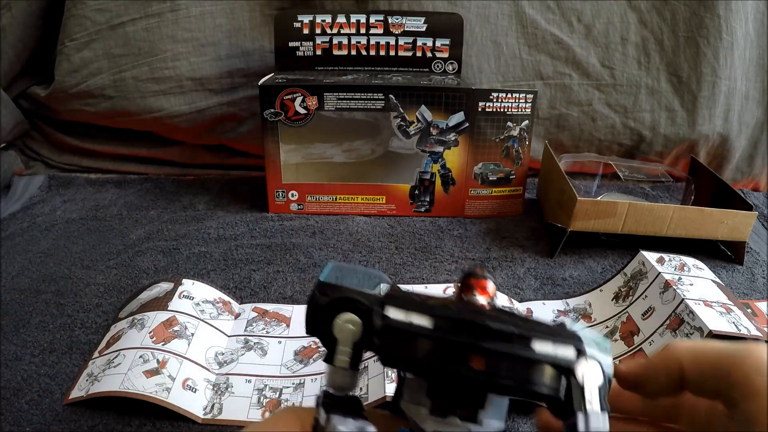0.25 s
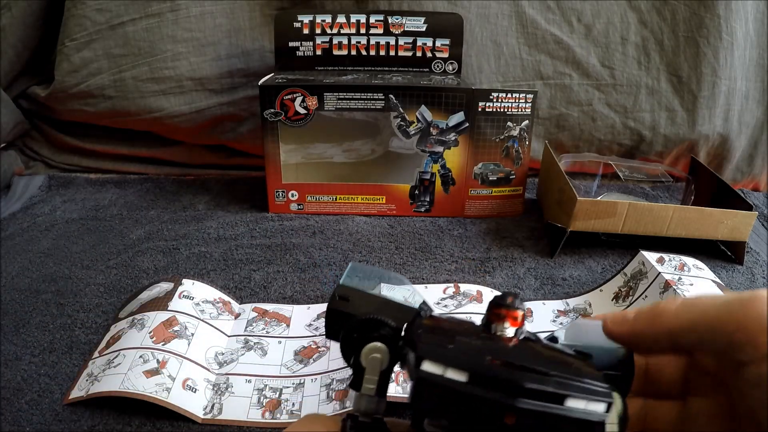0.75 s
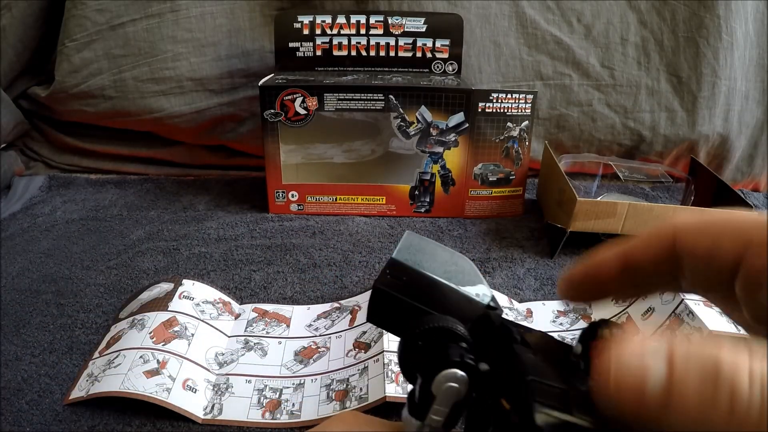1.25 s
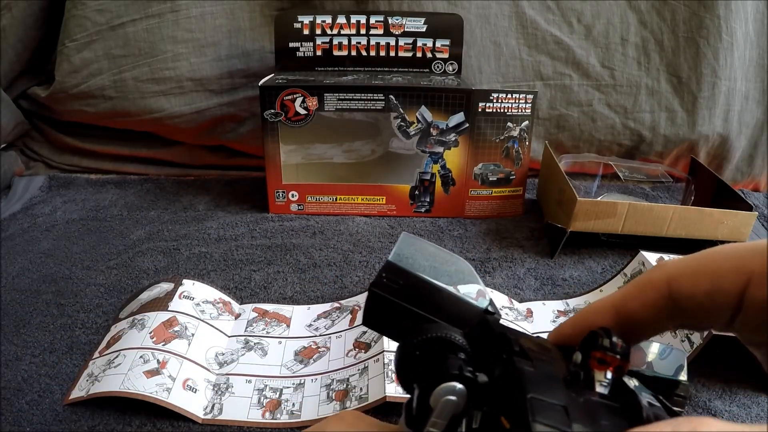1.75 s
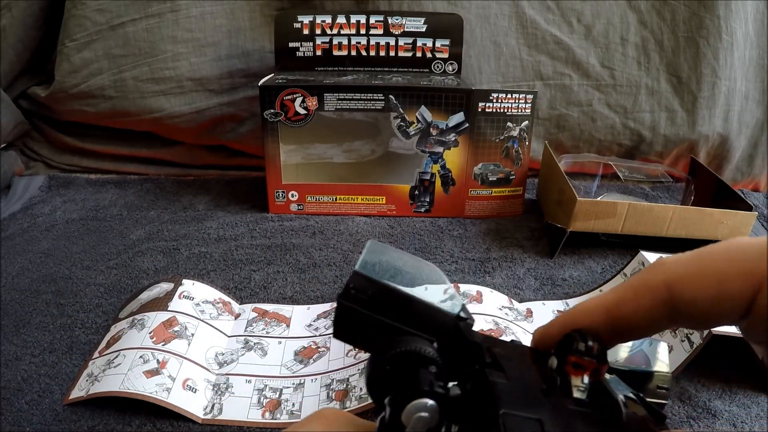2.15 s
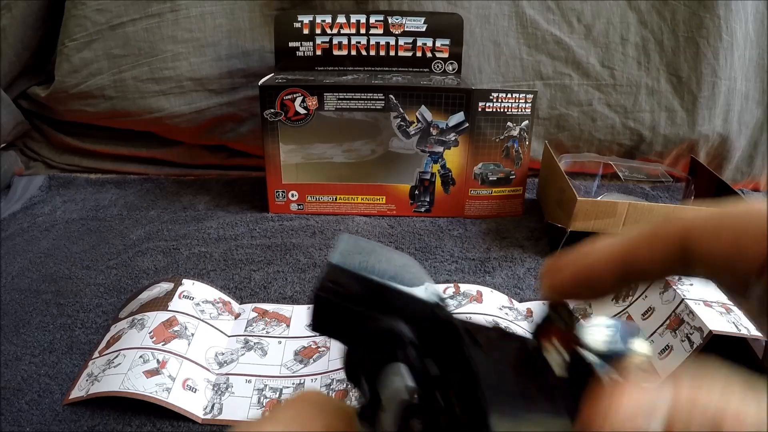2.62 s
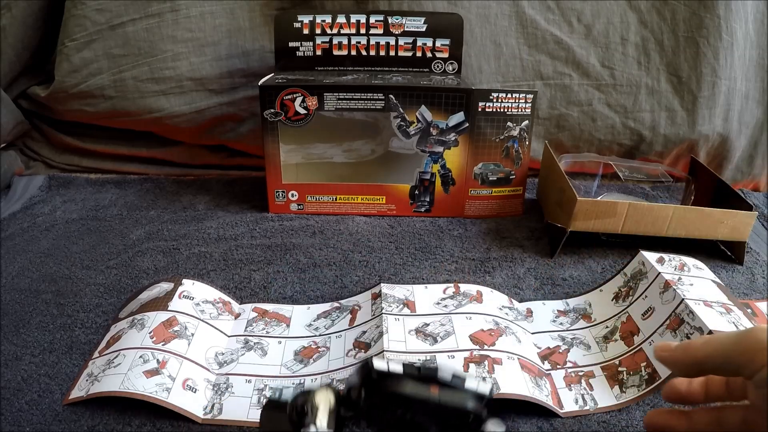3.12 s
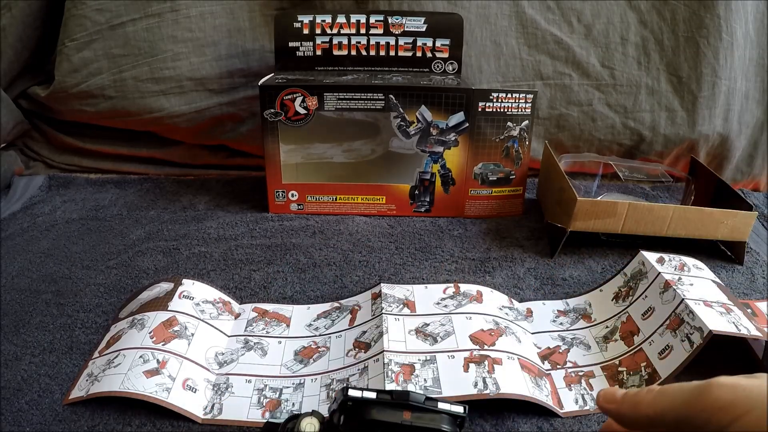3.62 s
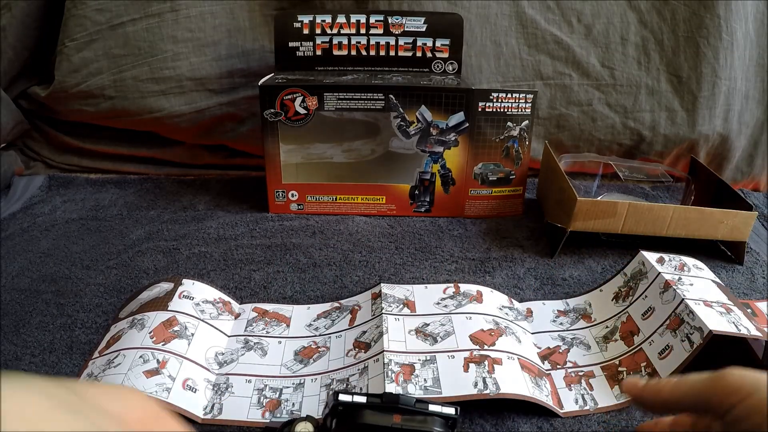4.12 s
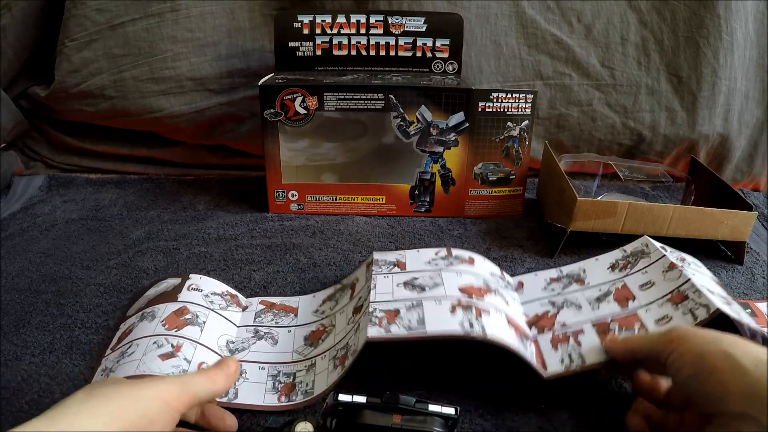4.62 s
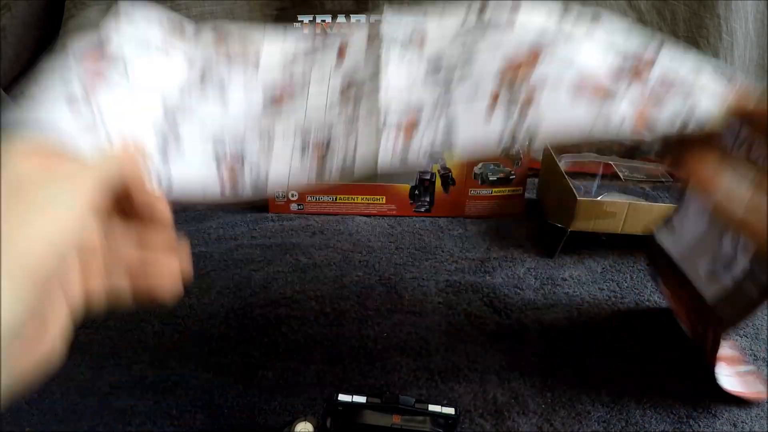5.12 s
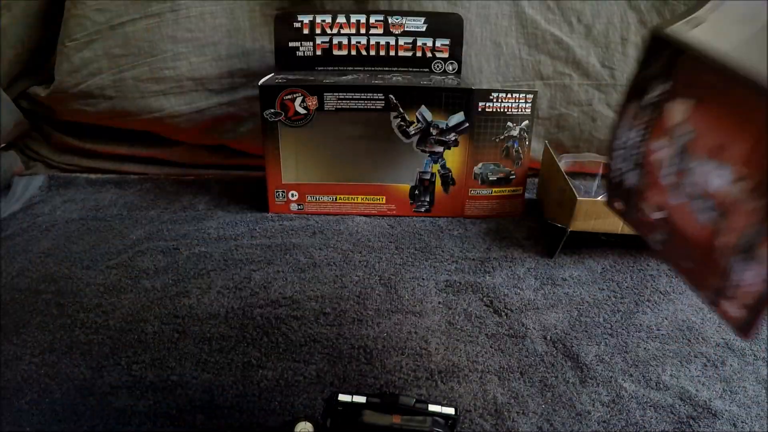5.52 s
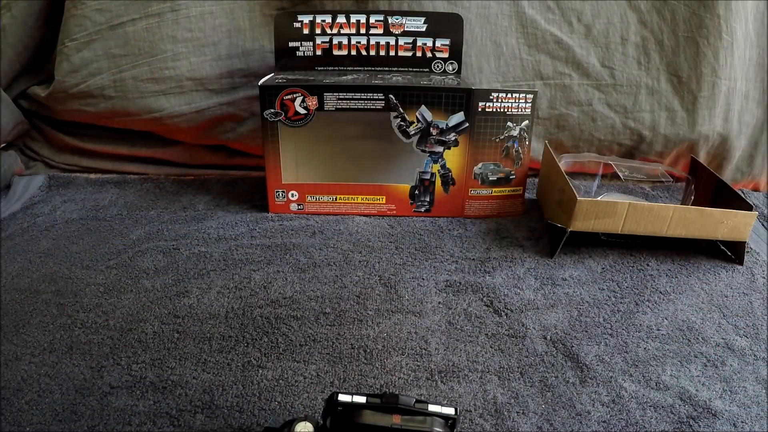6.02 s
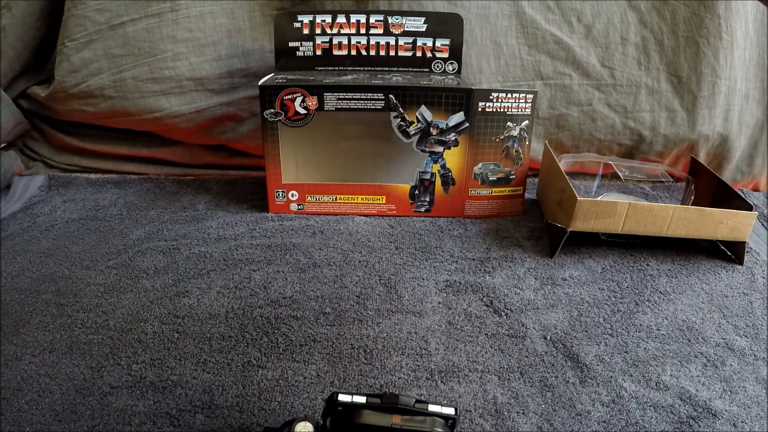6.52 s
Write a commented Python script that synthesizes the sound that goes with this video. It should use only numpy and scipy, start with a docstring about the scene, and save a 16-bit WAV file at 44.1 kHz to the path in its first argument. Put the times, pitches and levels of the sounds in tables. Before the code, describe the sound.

Close to the microphone, fingers rub a hollow plastic toy figure. A very loud, sharp joint snap rings its shell, a weaker one follows, then stiff scrapes and small clicks. The toy is set down with faint ticks. Hands softly brush cloth, and a folded paper sheet crackles and swishes away. A quiet, draped room rumbles beneath.

```python
"""Handling a hollow figure and a paper sheet

A hollow plastic toy figure is worked close to the microphone: rubbing fingers and stiff, sliding joints drive
its shell with friction, and snaps ring the shell's modes. It is laid on a cloth with light ticks of loose
parts. Hands brush the cloth (filtered grains of noise) and lift a folded sheet, which swishes, crinkles and
crackles. Hands bump the table and the swung sheet pushes air in low thuds; behind it all lie room rumble, a low
drone, microphone hiss and a thin whine."""
import sys
import numpy as np
from scipy import signal
from scipy.fft import rfft, irfft, next_fast_len
from scipy.io import wavfile

SR = 44100
rng = np.random.default_rng(int(sys.argv[2]) if len(sys.argv) > 2 else 0)


def wav_record(signal):
    """Record a signal, one row per channel, as 16-bit PCM in the file named by sys.argv[1]."""
    frames = np.transpose(np.atleast_2d(signal))
    bounded = np.clip(frames, -1, 1)
    # unit amplitude maps onto the largest positive 16-bit level
    quanta = np.round(bounded * 32767).astype(np.int16)
    wavfile.write(sys.argv[1], SR, quanta)


N = 298116  # length [samples]

# Levels in the tables are relative; the functions set the final gains.
# Spectrum of the room rumble: (frequency [Hz], level [dB])
ROOM_SPECTRUM = [(11, -33.5), (18, -1), (32, -2), (59, -7), (74, -15), (86, -16.5), (135, -20),
                 (146, -21.5), (179, -24.5), (216, -25), (280, -31.5), (300, -28), (390, -68), (660, -120)]
# Narrow band of the drone: (frequency [Hz], level [dB])
DRONE_SPECTRUM = [(35, -56), (52, -13.5), (60, 0.0), (68, -3), (100, -66.5)]
# Spectrum of the microphone hiss: (frequency [Hz], level [dB])
HISS_SPECTRUM = [(150, -30.5), (250, -3), (341, -3), (391, -4), (427, -3), (449, -3), (592, -6.5),
                 (646, -7.5), (836, -10), (1880, -12.5), (4610, -15.5), (13200, -24.5), (15400, -26.5)]
# Faint whine of the electronics: (frequency [Hz], rms level [dB])
WHINE_PARTIALS = [(8603, -99), (8629, -96.5), (8662, -95), (11811, -103), (11838, -104)]
# Fingers rubbing on the figure: (start [s], length [s], shell friction [dB], skin hiss [dB])
RUB_STROKES = [(.5, 0.41, -70.5, -84), (.71, 0.048, -62, -74), (.93, 0.16, -70, -75.5),
               (1.055, .125, -59.5, -70), (1.115, 0.022, -56.5, -72), (1.37, 0.076, -58, -77.5),
               (1.65, 0.13, -53, -80.5), (1.81, 0.13, -60.5, -87), (2.0, 0.025, -50, -66.5),
               (2.1, 0.044, -60, -86.5), (2.17, 0.24, -69.5, -87.5), (2.533, .015, -56, -81)]
# Spectrum of the skin's hiss: (frequency [Hz], level [dB])
SKIN_SPECTRUM = [(650, -29), (1100, 4), (1320, -7), (1580, -11), (1760, -2), (1980, -7), (2810, -2.5),
                 (3010, -8.5), (3280, -8.5), (5770, -15.5), (7000, -43), (9100, -51), (15400, -120)]
# Force of sliding plastic on the shell: (frequency [Hz], level [dB])
FRICTION_SPECTRUM = [(300, 1.5), (430, -1), (495, 10.5), (560, -2.5), (950, -5), (1330, 11), (1900, -7),
                     (3400, 0.5), (4400, -8.5), (6000, -2)]
# Sliding joints: (time of the strongest [s], level [dB], rise constant [s], fall constant [s])
JOINT_SLIDES = [(1.435, -45, 0.013, 0.009), (1.703, -56, 0.0092, 0.03), (1.786, -54, 0.011, 0.016),
                (2.591, -42.5, 0.019, 0.009)]
# Modes of the figure's shell: (frequency [Hz], level [dB], 60 dB decay time [s])
SHELL_MODES = [(357, -24.5, 0.078), (422.6, -14, 0.078), (458, -14, 0.076), (487.6, -17, 0.091),
               (528, -20, 0.095), (567, -32, 0.135), (648, -10, 0.053), (670, -15.5, 0.027),
               (753.3, -23, 0.12), (833, -19.5, 0.049), (894, -14, 0.04), (975, -16.5, 0.027),
               (1062, -34, 0.106), (1261.6, -46.5, 0.12), (1332, -40, 0.123), (1570, -42.5, 0.065),
               (1652, -39.5, 0.069), (1853, -34.5, 0.048), (2025, -50.5, 0.1), (2051, -38.5, 0.058),
               (2213, -29.5, 0.019), (2582, -35, 0.054), (2690, -27, 0.02), (3233, -25.5, 0.014),
               (3415, -28, 0.02), (3924, -49.0, 0.04), (4331, -33.5, 0.027), (4880, -36, 0.016),
               (5570, -35.5, 0.012), (1826, -48.5, 0.23)]
# Dull low thuds of hands bumping the table and of air pushed by the swung sheet: (time [s], level [dB])
TABLE_BUMPS = [(1.164, -62), (1.278, -52), (1.44, -46.5), (4.565, -64), (4.799, -53), (5.018, -53),
               (5.068, -50)]
# Modes of the table: (frequency [Hz], level [dB], 60 dB decay time [s])
TABLE_MODES = [(71.6, 2, 0.16), (113, -1, .1), (151, -2.5, .09), (196.7, -5.5, 0.053), (255, -5.5, 0.16)]
# Joints snapping and slipping: (time [s], level [dB], spectral tilt [dB per octave])
JOINT_SNAPS = [(1.273, -0.5, 0.5), (1.4248, -31.5, -4.5), (1.4388, -36.5, -12), (1.537, -13, -4.5),
               (2.3333, -40, -1.5), (2.532, -39.5, -9), (2.577, -27.5, -5), (2.5893, -21, -4.5)]
# Buzz of neighbouring parts after a snap: (frequency [Hz], level [dB])
BUZZ_SPECTRUM = [(300, -31), (700, 3), (1300, 3), (2200, -9.5), (3300, -5.5), (4000, -20), (6000, -22.5)]
# Ticks as the figure is laid down: (time [s], level [dB])
PART_TICKS = [(3.229, -73), (3.231, -59), (3.2453, -64), (3.2492, -64.5), (3.2502, -61), (3.290, -77)]
# Modes of the small loose parts: (frequency [Hz], level [dB], 60 dB decay time [s])
PART_MODES = [(1640, -10, 0.037), (2100, 5.5, 0.021), (2540, -2.5, 0.02), (3230, 7.5, 0.014),
              (4250, -2.5, 0.013), (5000, 2.5, 0.016), (5600, 2.5, 0.014), (6360, 5.5, 0.017),
              (8400, -14, .012)]
# Hands sweeping over the cloth: (start [s], length [s], level [dB])
CLOTH_SWEEPS = [(3.45, 0.063, -62.5), (3.6, 0.11, -61), (3.84, 0.088, -63.5), (3.98, 0.13, -60),
                (4.085, 0.076, -55.5), (4.245, 0.053, -55), (4.35, .23, -60.5), (4.68, 0.21, -60),
                (4.92, 0.042, -59.5), (4.99, 0.049, -49.5)]
# Spectrum of the brushed cloth: (frequency [Hz], level [dB])
CLOTH_SPECTRUM = [(110, -31), (180, -27), (329, -9), (460, -1), (513, 0.5), (586, -6.5), (773, -21),
                  (851, -17), (1010, -12), (1390, -35), (1820, -26.5), (2120, -35), (2840, -24),
                  (3200, -52), (4160, -48), (7040, -120)]
# The sheet swishing as it is gripped, raised and swung away: (start [s], length [s], level [dB])
SHEET_SWISHES = [(4.35, 0.14, -67), (4.74, .2, -71.5), (5.13, 0.081, -69), (5.25, 0.25, -77)]
# Spectrum of the rustle of sheet and nap: (frequency [Hz], level [dB])
RUSTLE_SPECTRUM = [(760, -28), (1300, -4.5), (1660, -18), (2350, 2), (2520, 2), (2930, 1), (3710, -7),
                   (4390, -3.5), (5070, -6), (8000, -22), (10400, -26), (17600, -120)]
# Creases of the sheet buckling: (time [s], level [dB], spectral tilt [dB per octave])
SHEET_CREASES = [(4.369, -68, 8.5), (4.450, -73, 10.5), (4.555, -59.5, -1), (4.792, -61, -3),
                 (4.916, -80, 13.5), (5.005, -57, -4.5), (5.0162, -49, 5.5), (5.0202, -51.5, 4.5),
                 (5.026, -54.5, -5), (5.051, -62, 6.5), (5.204, -76.5, -9), (5.6135, -91.5, 19)]
# Modes of the folded sheet: (frequency [Hz], level [dB], 60 dB decay time [s])
SHEET_MODES = [(229.6, 0.5, 0.13), (299, -1, 0.13), (416, 3, 0.038), (510, -19, 0.055), (847, -3.5, 0.033),
               (1020, 1, 0.047), (1160, -4, 0.038), (1330, 1, 0.031), (1600, -10.5, 0.018),
               (1970, -7.5, 0.062), (2230, -4, 0.042), (2360, -9, .04), (2580, -12, 0.02), (2890, -9, .035),
               (3180, -11.5, 0.024), (3950, -12, 0.018), (4100, -15, .012), (4400, -9, 0.0075),
               (4810, -16.5, 0.021), (5530, -15.5, 0.011)]

ROOM_DB, DRONE_DB, HISS_DB = -57, -61.5, -70  # rms levels [dB]
RUB_ATTACK_S, RUB_RELEASE_S = 0.012, 0.025
SWEEP_ATTACK_S, SWEEP_RELEASE_S = 0.015, 0.038
SWISH_ATTACK_S, SWISH_RELEASE_S = 0.033, 0.12
NAP_DB = -16  # hiss of the cloth's nap, relative to the sweep's gain
TOP_HZ = 15350  # upper band edge of the recorder


def undb(db):
    """Decibel scale: level to amplitude ratio."""
    return 10 ** (np.asarray(db) / 20)


def unit(x):
    """Normalisation to rms 1."""
    return x / np.sqrt(np.mean(x ** 2))


def butter(x, hz, kind, order):
    """Causal Butterworth filtering: low-, high- or band-pass."""
    return signal.sosfilt(signal.butter(order, hz, kind, fs=SR, output="sos"), x)


def colour(x, points):
    """Spectral shaping: weight x by (Hz, dB) points joined on a log frequency axis, at rms 1."""
    hz, db = np.transpose(points)
    size = next_fast_len(N)
    freq = np.maximum(np.fft.rfftfreq(size, 1 / SR), 1)
    gain = undb(np.interp(np.log(freq), np.log(hz), db))
    return unit(irfft(rfft(x, size) * gain, size)[:N])


def add(out, s, x):
    """Superposition: mix x into out from time s."""
    i = int(s * SR)
    out[i:i + len(x)] += x[:N - i]


def decay(t, t60):
    """Exponential damping: a fall of 60 dB in t60 seconds."""
    return np.exp(-np.log(1000) * t / t60)


def ring(modes, tilt_db=0, pivot_hz=500):
    """Modal impulse response: damped sines of alternating sign; a softer contact is a negative tilt."""
    t = np.arange(SR // 3) / SR
    hz, db, t60 = np.transpose(modes)[:, :, None]
    sign = (-1) ** np.arange(len(modes))[:, None]
    size = sign * undb(db + tilt_db * np.log2(hz / pivot_hz))
    return np.sum(size * decay(t, t60) * np.sin(2 * np.pi * hz * t), axis=0)


def burst(t60):
    """Decaying random excitation: noise of unit energy that dies away."""
    t = np.arange(SR // 2) / SR
    x = rng.standard_normal(len(t)) * decay(t, t60)
    return x / np.sqrt(np.sum(x ** 2))


def grains(rate, spread_db):
    """Random impulse train: rate tiny slips a second on average, a few much larger than the rest."""
    happens = rng.random(N) < rate / SR
    sign = rng.choice([-1, 1], N)
    return happens * sign * undb(spread_db * np.minimum(rng.exponential(size=N), 4))


def wander(rate):
    """Random modulation: rate random values a second, joined by straight lines."""
    return np.interp(np.arange(N) / SR * rate, np.arange(1000), rng.standard_normal(1000))


def strokes(rows, attack_s, release_s, column=2):
    """Power addition of rubbing strokes: the gain of each gathers, holds, then dies away."""
    t = np.arange(N) / SR
    power = np.zeros(N)
    for row in rows:
        since = t - row[0]
        attack = np.clip(since / attack_s, 0, 1)
        release = np.exp(-np.maximum(since - row[1], 0) / release_s)
        power += (undb(row[column]) * attack * release) ** 2
    return np.sqrt(power)


def background():
    """Stationary noise: room rumble, a narrow drone around 60 Hz and microphone hiss, plus the whine."""
    rumble = undb(ROOM_DB) * colour(rng.standard_normal(N), ROOM_SPECTRUM)
    drone = undb(DRONE_DB) * colour(rng.standard_normal(N), DRONE_SPECTRUM)
    hiss = undb(HISS_DB) * colour(rng.standard_normal(N), HISS_SPECTRUM)
    return rumble + drone + hiss + whine()


def whine():
    """Beating: steady sines close in frequency make the whine flutter."""
    t = np.arange(N) / SR
    return sum(undb(db) * np.sqrt(2) * np.sin(2 * np.pi * hz * t) for hz, db in WHINE_PARTIALS)


def skin_hiss():
    """Rubbing friction: dense small slips of skin, heard directly."""
    skin = colour(grains(rate=7000, spread_db=1.0), SKIN_SPECTRUM)
    return undb(4) * skin * strokes(RUB_STROKES, RUB_ATTACK_S, RUB_RELEASE_S, column=3)


def shell_friction():
    """Friction-driven resonance: slips under fingers and in sliding joints excite the shell's modes."""
    t = np.arange(N) / SR
    force = undb(-5.5) * strokes(RUB_STROKES, RUB_ATTACK_S, RUB_RELEASE_S)
    for s, db, rise, fall in JOINT_SLIDES:
        force += undb(db - 2) * np.exp(-np.maximum((s - t) / rise, (t - s) / fall))
    slips = colour(grains(rate=1200, spread_db=3.0), FRICTION_SPECTRUM)
    shell = ring(SHELL_MODES)
    unit_energy_shell = shell / np.sqrt(np.sum(shell ** 2))
    return signal.fftconvolve(force * slips, unit_energy_shell)[:N]


def table():
    """Modal response: each bump, or push of air from the swung sheet, gives a short, low thud through the
    table's modes."""
    out = np.zeros(N)
    for s, db in TABLE_BUMPS:
        add(out, s, undb(db) * ring(TABLE_MODES))
    return out


def snaps():
    """Impact excitation: each snap rings the shell and sets neighbouring parts buzzing."""
    t = np.arange(SR // 2) / SR
    out, jolt = np.zeros(N), np.zeros(N)
    for s, db, tilt_db in JOINT_SNAPS:
        add(out, s, undb(db) * ring(SHELL_MODES, tilt_db))
        # the brighter the snap, the stronger the buzz
        add(jolt, s + 0.00083, undb(db + tilt_db) * np.exp(-t / 0.016))
    return out + undb(-41) * jolt * colour(rng.standard_normal(N), BUZZ_SPECTRUM)


def figure():
    """Band-limited radiation: a small shell radiates little bass; its sound falls steeply above 6 kHz."""
    shell = butter(shell_friction() + snaps(), 5980, "low", order=12)
    return butter(shell, 230.4, "high", order=2) + skin_hiss()


def loose_parts():
    """Chattering contact: a blow and a brief burst of noise ring the light parts."""
    out = np.zeros(N)
    for s, db in PART_TICKS:
        contact = 0.93 * burst(t60=0.026)
        contact[0] += 1  # the blow itself
        add(out, s, undb(db) * signal.fftconvolve(contact, ring(PART_MODES)))
    return out


def cloth_and_rustle():
    """Granular friction: hands brush the cloth and its nap hisses; the sheet rustles."""
    sweep = strokes(CLOTH_SWEEPS, SWEEP_ATTACK_S, SWEEP_RELEASE_S)
    brush = sweep * colour(grains(rate=4900, spread_db=4), CLOTH_SPECTRUM)
    sheet = strokes(SHEET_SWISHES, SWISH_ATTACK_S, SWISH_RELEASE_S)
    fibres = colour(grains(rate=2500, spread_db=2.5), RUSTLE_SPECTRUM)
    rustle = fibres * np.hypot(sheet, undb(NAP_DB) * sweep)
    # broad panels swish and small folds crinkle, each in its own time
    swish = butter(rustle, 3600, "low", order=5) * undb(2.7 * wander(rate=8.3))
    crinkle = butter(rustle, 3670, "high", order=5) * undb(3.0 * wander(rate=26))
    return undb(-3.0) * brush + undb(-2.5) * (swish + crinkle)


def creases():
    """Buckling: each crease gives way with a blow and a short crackle that ring the sheet."""
    out = np.zeros(N)
    for s, db, tilt_db in SHEET_CREASES:
        crackle = 1.27 * butter(burst(t60=0.059), [700, 3500], "band", order=1)
        crackle[0] += 1  # the blow itself
        add(out, s, undb(db) * signal.fftconvolve(crackle, ring(SHEET_MODES, tilt_db, pivot_hz=990)))
    return out


def scene():
    """Reverberation: everything is close; the draped room returns only a faint, dull tail."""
    near = figure() + table() + loose_parts() + cloth_and_rustle() + creases()
    tail = np.zeros(N)
    add(tail, 0.012, butter(burst(t60=0.3), 2500, "low", order=1))
    room = signal.fftconvolve(near, tail[:SR])[:N]
    return (near + undb(-27.5) * room + background())[None]


def record(dry):
    """Band limiting: the recorder cuts the top with a steep, zero-phase elliptic low-pass."""
    return signal.sosfiltfilt(signal.ellip(10, 0.1, 60, TOP_HZ, fs=SR, output="sos"), dry)


dry = scene()
out = record(dry)
wav_record(out)
```